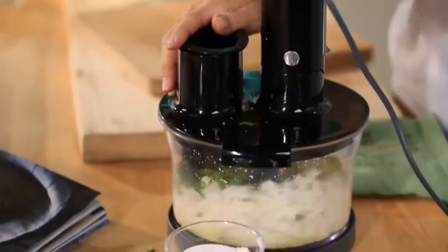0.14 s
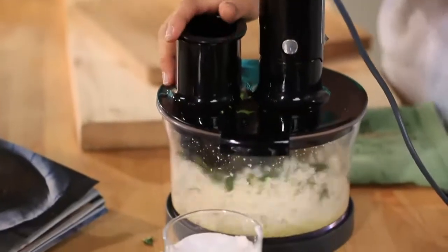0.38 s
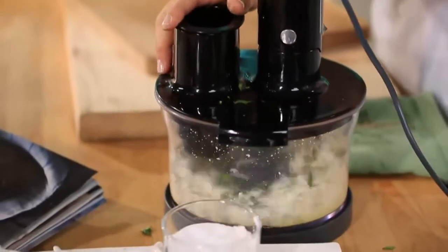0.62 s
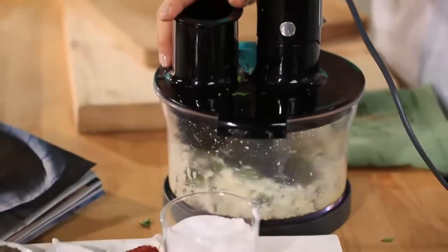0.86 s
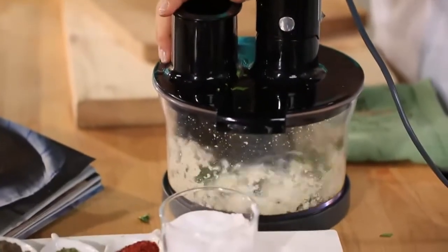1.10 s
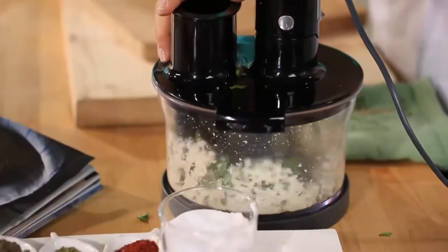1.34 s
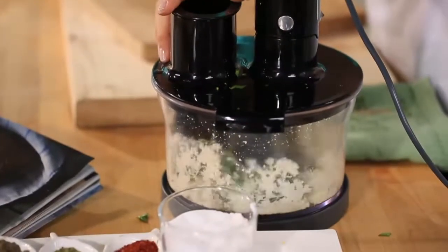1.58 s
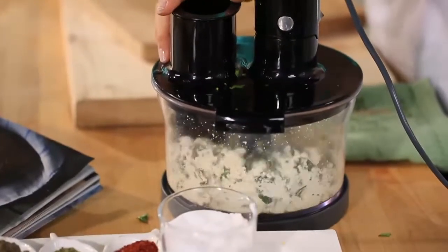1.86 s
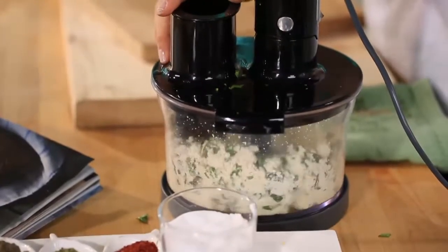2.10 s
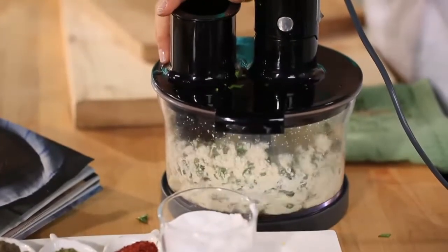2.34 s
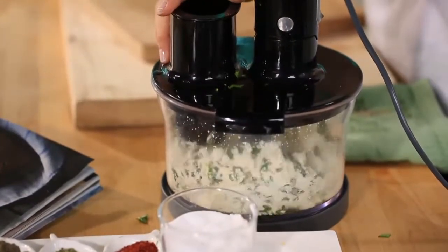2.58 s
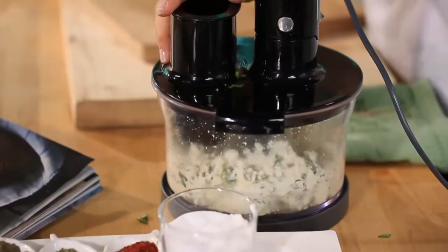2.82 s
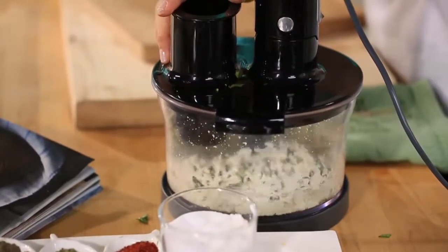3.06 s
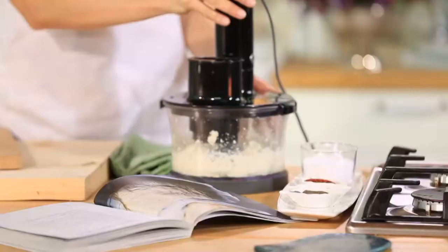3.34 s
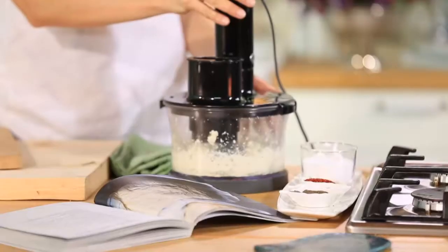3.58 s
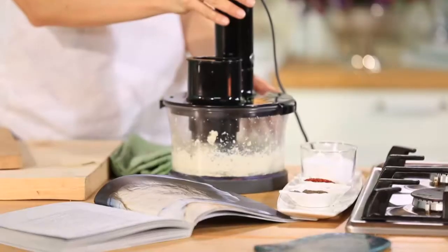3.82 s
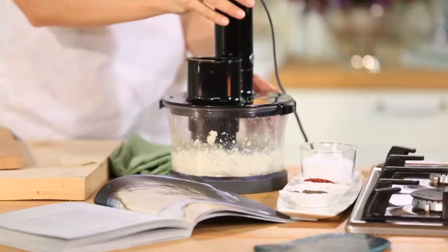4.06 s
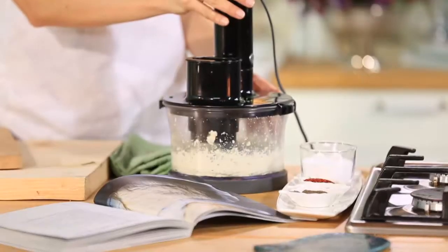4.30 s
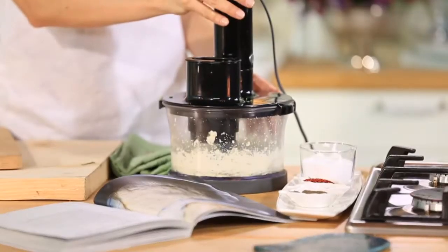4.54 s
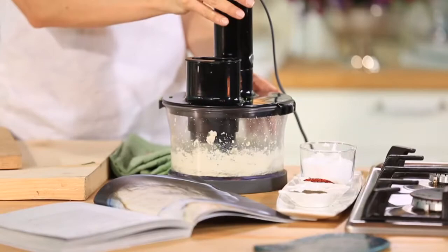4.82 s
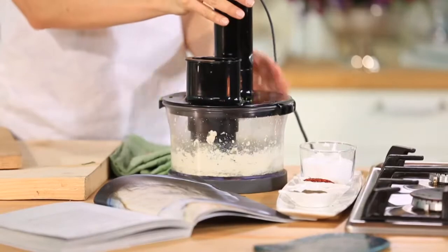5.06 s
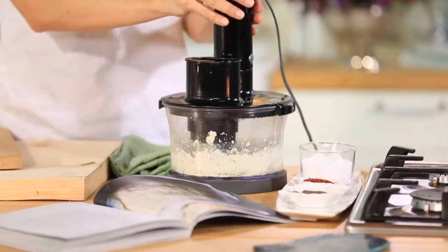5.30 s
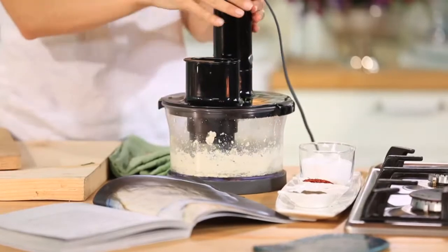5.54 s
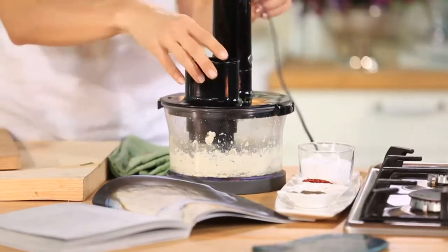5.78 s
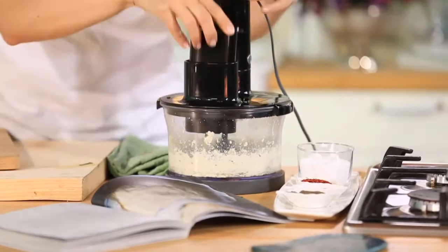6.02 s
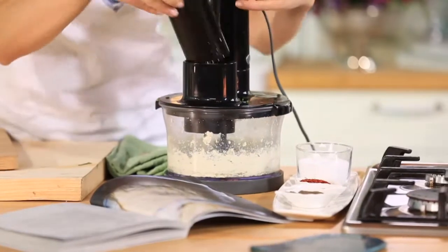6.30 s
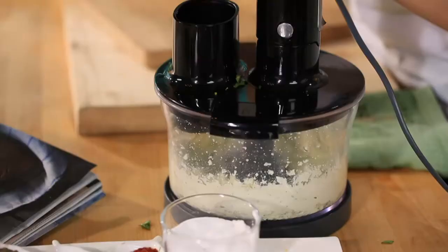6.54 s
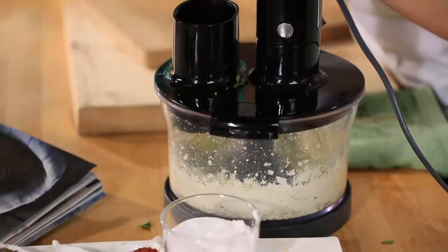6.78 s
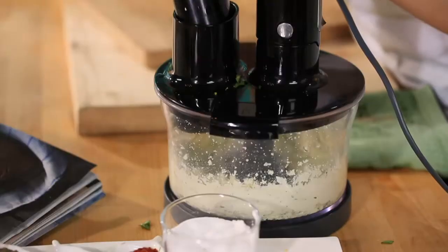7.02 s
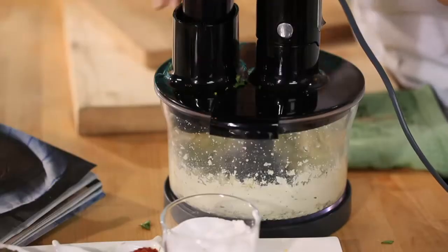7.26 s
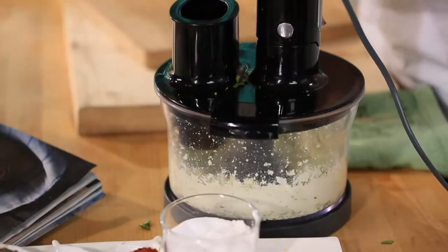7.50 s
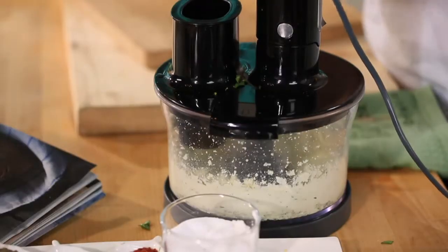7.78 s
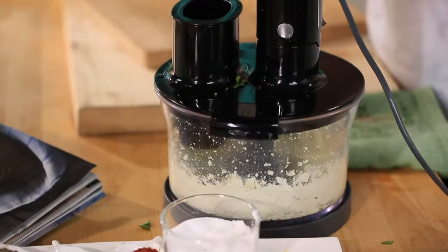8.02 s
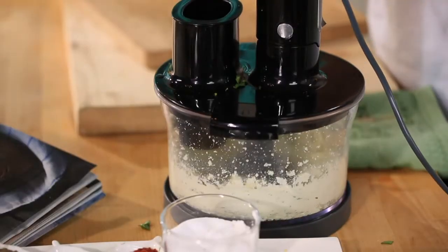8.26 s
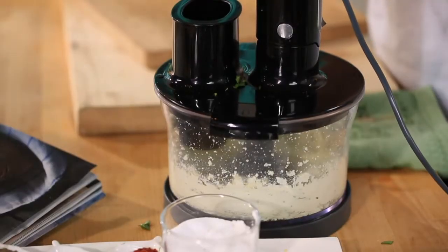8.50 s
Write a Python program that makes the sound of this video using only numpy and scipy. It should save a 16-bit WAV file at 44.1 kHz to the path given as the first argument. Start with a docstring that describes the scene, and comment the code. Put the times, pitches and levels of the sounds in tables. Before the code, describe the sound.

Electric blender whirring on a chopper bowl stops abruptly; a plastic pusher rattles and drops into its tube before the gritty whir resumes.

```python
"""Kitchen worktop: a hand blender drives a chopper bowl, stops, and later starts again.
Motor: whine and multiples, smeared gear-mesh tones, gear and brush noise through housing resonances.
While it rests, the pusher is drawn from the feed tube, rattles and drops home: knocks ring
decaying modes, sliding is gritty noise. Below: noise-like room air and a thin high steady whine."""
import sys
import numpy as np
from scipy import signal
from scipy.fft import rfft, irfft
from scipy.io import wavfile

SR = 44100
rng = np.random.default_rng(int(sys.argv[2]) if len(sys.argv) > 2 else 0)


def boost(x):
    """Linear amplitude factor 10**(x/20) for a level x in decibels (scalar or array-like)."""
    u = np.asarray(x, float) / 20
    return 10 ** u


def generate_wav(sig):
    """Save sig (samples, or channels by samples) to the path in sys.argv[1] as 16-bit PCM at SR."""
    pcm = np.round(np.clip(np.atleast_2d(sig).T, -1, 1) * 32767).astype(np.int16)
    wavfile.write(sys.argv[1], SR, pcm)


N = 380583


def rms_one(x):
    """Scale to rms 1."""
    return x / np.sqrt(np.mean(x ** 2) + 1e-20)


def in_time(rows):
    """Interpolate the columns of a timed table, sample by sample."""
    s, *columns = np.transpose(rows)
    return [np.interp(np.arange(N) / SR, s, c) for c in columns]


def butter(x, order, hz, kind="low"):
    """Butterworth filter."""
    return signal.sosfilt(signal.butter(order, hz, kind, fs=SR, output="sos"), x)


def drift(rate_hz):
    """Random wander, rms 1: white noise through two one-poles at rate_hz."""
    hop = 40   # samples per computed point
    r = np.exp(-2 * np.pi * rate_hz * hop / SR)
    white = rng.standard_normal(N // hop + 2002)
    slow = signal.lfilter([1], [1, -2 * r, r * r], white)[2000:]   # filter run-in dropped
    return np.interp(np.arange(N) / hop, np.arange(len(slow)), rms_one(slow))


def wavering_band(phase, rate_hz):
    """Narrow noise band: two quadrature carriers with independent random drift."""
    return drift(rate_hz) * np.cos(phase) + drift(rate_hz) * np.sin(phase)


def coloured(x, spectrum, peaks=()):
    """Broad spectrum times resonant peaks."""
    hz = np.fft.rfftfreq(N, 1 / SR) + 1
    points = np.array(spectrum)
    db = np.interp(np.log(hz), np.log(points[:, 0]), points[:, 1])
    for centre_hz, width_hz, peak_db in peaks:
        db = db + peak_db / (1 + (2 * (hz - centre_hz) / width_hz) ** 2)
    return irfft(rfft(x) * boost(db), N)


def ring(clicks, hz, t60_s):
    """Damped two-pole resonator: a unit click starts a sine of height 1."""
    r, w = boost(-60 / (t60_s * SR)), 2 * np.pi * hz / SR
    return signal.lfilter([0, np.sin(w)], [1, -2 * r * np.cos(w), r * r], clicks + 1e-18)


# switch presses: on t/s, off t/s, spin-up time constant/s
RUNS = [(0.093, 5.532, .062), (7.747, 9.0, .11)]
START_SHARE, COAST_S = 0.5, 0.14   # share of full speed at switch-on; run-down
ATTACK_S, FULL_S, FULL_DB, COAST_DB = 0.0023, 0.025, 13.5, 30.5   # quick rise, slower rest; run-down loss


def switch():
    """Share of full speed while spinning up, run-down seconds, level/dB (silent at rest)."""
    t = np.arange(N) / SR
    run = np.maximum(np.digitize(t, [on for on, *_ in RUNS]) - 1, 0)
    on_s, off_s, spin_s = np.transpose(RUNS)[:, run]
    since, coast_s = np.maximum(t - on_s, 1e-9), np.maximum(t - off_s, 0)
    spin = 1 - (1 - START_SHARE) * np.exp(-since / spin_s)
    attack = 1 - np.exp(-(since / ATTACK_S) ** 2)
    rise_db = 20 * np.log10(attack + 1e-9) - FULL_DB * np.exp(-since / FULL_S)
    level_db = np.where(coast_s < COAST_S, rise_db - COAST_DB * (coast_s / COAST_S) ** 2, -200)
    return spin, coast_s, level_db


# blade catches food, slows, frees itself: t/s of lowest speed, whine drop/Hz
SNAGS = [(3.44, 8.37), (3.689, 28), (4.1, 31.7), (4.39, 34), (4.7, 28), (4.96, 26.3), (5.129, 32.5),
         (5.388, 24), (8.126, 38), (8.351, 37.7), (8.509, 13.4)]
SNAG_FALL_S, SNAG_RISE_S = 0.07, 0.03
COAST_HZ_PER_S = 1600
CRUISE_HZ, SPEED_RANGE_PERCENT = 388, 16.3


def rotor(cruise_hz, spin, coast_s):
    """Whine phase (two beats a turn), speed offset/% and snag/Hz: load and snags slow the blade."""
    t = np.arange(N) / SR
    snag_hz = np.zeros(N)
    for s, drop_hz in SNAGS:
        length_s = np.where(t < s, SNAG_FALL_S, SNAG_RISE_S)
        snag_hz += drop_hz * np.exp(-((t - s) / length_s) ** 2)
    whine_hz = np.maximum((cruise_hz - snag_hz) * spin - COAST_HZ_PER_S * coast_s, 50)
    offset_percent = 100 * (whine_hz / CRUISE_HZ - 1)
    offset_percent = np.clip(offset_percent, -SPEED_RANGE_PERCENT, SPEED_RANGE_PERCENT)
    phase = 2 * np.pi * np.cumsum(whine_hz * (1 + 0.001994 * drift(18.85))) / SR
    return phase, offset_percent, snag_hz


WHINE_WAVER_DB, UNBALANCE_POWER = 2.0, 2.1


def whine(phase, whine_db, spin):
    """Rotor tone; amplitude grows with a power of speed during spin-up."""
    level = boost(whine_db + WHINE_WAVER_DB * drift(10.6)) * spin ** UNBALANCE_POWER
    return np.sqrt(2) * level * np.sin(phase)


# multiple of whine, level/dB re common strength, dB per % speed, dB per Hz snag, waver/dB
ORDER_TONES = [(2, -16, 1.4, 0, 2.5), (3, -9.5, 0.03, -.28, 1.2), (6, -14.5, 0.5, -0.14, 1.5),
               (6.5, -24, -1, 0, 3), (7, -12.5, 0, .24, 1.5), (8, -27, -.9, -.15, 2),
               (13, -28, 0, 0.0276, 2.5)]
# coupling takes up the load, 7th multiple flares: t/s, length/s, level/dB
TAKE_UPS = [(0.175, .03, 8), (7.787, .013, 13)]


def multiples(phase, multiples_db, offset_percent, snag_hz):
    """Multiples of the whine; each level follows speed and snags and wavers."""
    t = np.arange(N) / SR
    flare_db = sum(db * np.exp(-((t - s) / length_s) ** 2) for s, length_s, db in TAKE_UPS)
    out = np.zeros(N)
    for k, db, slope_db, snag_db, waver_db in ORDER_TONES:
        level_db = multiples_db + db + flare_db * (k == 7)
        level_db = level_db + slope_db * offset_percent + snag_db * snag_hz + waver_db * drift(7.5)
        out += np.sqrt(2) * boost(level_db) * np.sin(k * phase + k * k)
    return out


# multiple of whine, smear rate/Hz, level/dB re gear noise
MESH = [(10.75, 170, -17.5), (13.06, 430, -13), (20.67, 290, -17.5), (27.2, 220, -14), (34, 200, -24)]


def gear_mesh(phase, hum):
    """Uneven teeth smear each mesh tone into a band that follows the speed."""
    mesh = np.zeros(N)
    for k, smear_hz, db in MESH:
        mesh += np.sqrt(2) * boost(db + 2.0 * drift(7.3)) * drift(smear_hz) * np.sin(k * phase)
    return mesh * (1 + 0.068 * hum)


def gear_noise(phase, hum, throb=0.11):
    """White noise throbbing once and twice a turn, lightly at twice the mains."""
    throbbing = 1 + throb * (np.cos(phase / 2) + np.cos(phase)) + 0.13 * hum
    return rng.standard_normal(N) * throbbing * boost(1.07 * drift(25))


# brush hiss/dB re gear noise, one value per stage
HISS_DB = [11.5, 7, 5]
HISS_LAG_S, HISS_LAG_DB = 0.015, 9.5   # hiss comes up just after the gears


def brush_hiss(phase, hum, stage, throb=0.19):
    """White noise throbbing at twice the mains and once a turn."""
    t = np.arange(N) / SR
    hiss_db = np.array(HISS_DB)[stage]
    for on_s, *_ in RUNS:
        hiss_db = hiss_db - HISS_LAG_DB * (t < on_s + 0.1) * np.exp(-np.maximum(t - on_s, 0) / HISS_LAG_S)
    throbbing = 1 + throb * hum + 0.1 * np.cos(phase / 2)
    return boost(hiss_db) * rng.standard_normal(N) * throbbing * boost(0.28 * drift(40))


# broad motor noise colour: f/Hz, relative level/dB per Hz
MOTOR_NOISE = [(24, -48.5), (40, -32.5), (247, -7), (378, -1), (929, -9.5), (1160, -7), (2010, -11.5),
               (2590, -8.5), (3240, -15), (5070, -19.5), (6840, -22.5), (11000, -18), (15600, -29)]
# housing, bowl and tube resonances, per stage: f/Hz, width/Hz, level/dB re broad colour
FIRST_COLOUR = [(648, 56, 2), (1394, 680, 6.5), (2600, 770, 8), (4380, 430, 7), (5100, 630, 3.5),
                (6350, 230, 5.5), (7370, 130, 7.5), (8980, 400, 4.5), (9670, 160, 5), (10860, 920, 4),
                (11900, 290, -3), (13960, 500, 8.5), (15400, 190, 13.5)]
SECOND_COLOUR = [(614, 68, 0.7), (1110, 280, 4), (1700, 340, 8.8), (2550, 540, 5.2), (4200, 1600, 4.1),
                 (5080, 640, 5.2), (6230, 150, 8.4), (7250, 370, 9.1), (8300, 170, 3.7), (9350, 160, 2),
                 (10670, 2200, 11.7), (12100, 200, 1.2), (14100, 460, 2.9), (14610, 940, 12)]
RESTART_COLOUR = [(630, 49.9, 2.812), (1070, 540, 9.1), (1850, 190, 2.8), (2143, 920, 10.6),
                  (3020, 200, 7.8), (4770, 600, 8.4), (6180, 110, 1.8), (7360, 410, 8.7),
                  (10800, 2000, 6.5), (13700, 360, 4.4), (15500, 390, 8.6)]
HOUSING_SHARE = 0.42   # share of resonance dB applied to the multiples


def housing(gear, noise, tones, stage):
    """Plastic resonances colour noise and tones; the colour changes abruptly between stages."""
    out = np.zeros(N)
    for k, peaks in enumerate([FIRST_COLOUR, SECOND_COLOUR, RESTART_COLOUR]):
        # level reference: coloured gear noise within this band
        scale = np.std(butter(coloured(gear, MOTOR_NOISE, peaks), 4, [1300, 3500], "band"))
        out += coloured(noise * (stage == k), MOTOR_NOISE, peaks) / scale
        shallow = [(hz, width_hz, db * HOUSING_SHARE) for hz, width_hz, db in peaks]
        out += coloured(tones * (stage == k), [(1, 0), (SR, 0)], shallow)
    return out


# t/s, level/dB
BUZZ = [(0.19, -45), (0.45, -74), (0.8, -53), (0.9, -62), (1.06, -45), (1.27, -64), (1.43, -48.5),
        (1.9, -49), (2.27, -62), (2.55, -53.5), (3.33, -53.5), (3.42, -46.5), (5.52, -51), (7.9, -50),
        (8.25, -59), (8.63, -53)]


def winding_buzz(hum):
    """Windings hum at twice the mains, swelling and fading."""
    return np.sqrt(2) * boost(in_time(BUZZ)[0]) * hum


# per stage: f/Hz, flutter rate/Hz, level/dB, fade/dB per s
TUBE_AIR = [(595.7, 17, -23.5, 1.95), (630, 21, -35, -0.7), (618, 29, -29.5, 11)]


def tube_hum(stage):
    """Motor shakes the feed-tube air, which hums in a narrow, fluttering band."""
    out, t = np.zeros(N), np.arange(N) / SR
    for k, (hz, flutter_hz, db, fade_db) in enumerate(TUBE_AIR):
        now = stage == k
        start_s = max(t[now][0], RUNS[k // 2][0])
        out += now * boost(db - fade_db * (t - start_s)) * wavering_band(2 * np.pi * hz * t, flutter_hz)
    return out


# blade load: t/s, whine f/Hz, gear noise/dB, whine/dB, multiples/dB
DRIVE = [(0.1, 424, -22, -19, -25.5), (0.33, 426.2, -23.5, -34, -26.5), (0.55, 411.4, -24, -22, -27.5),
         (0.89, 394.6, -24, -24, -25.5), (1.0, 399.3, -25, -36, -30), (1.2, 391, -25, -33, -22.5),
         (1.55, 384.3, -25, -26, -27), (2.0, 385.5, -24.5, -25.5, -26), (2.53, 388.8, -25, -31.5, -25),
         (3.3, 388, -24.5, -27.5, -26), (3.5, 389, -26.5, -33, -26), (3.95, 379.2, -26, -30.5, -27),
         (4.3, 380.9, -26.5, -33.5, -27), (4.8, 390.8, -26, -34.5, -29.5), (5.3, 392.7, -26, -28.5, -23.5),
         (5.5, 383.6, -27, -30, -30), (7.79, 397, -25, -33, -24.5), (7.95, 398.8, -25, -31.5, -33),
         (8.2, 388, -25.5, -38.5, -29.5), (8.63, 390.2, -26.5, -32, -29)]
COLOUR_CHANGE_S, RESTART_S = 3.37, 7.0   # stage boundaries; the second lies in the pause
HUM_HZ = 100   # twice the mains


def motor():
    """Rotor tones, gear mesh, gear and brush noise, buzz and tube hum under one switch."""
    t = np.arange(N) / SR
    cruise_hz, noise_db, whine_db, multiples_db = in_time(DRIVE)
    spin, coast_s, switch_db = switch()
    phase, offset_percent, snag_hz = rotor(cruise_hz, spin, coast_s)
    stage = np.digitize(t, [COLOUR_CHANGE_S, RESTART_S])
    hum = np.cos(2 * np.pi * HUM_HZ * t)
    tones = multiples(phase, multiples_db, offset_percent, snag_hz)
    gear, brush = gear_noise(phase, hum), brush_hiss(phase, hum, stage)
    noise = boost(noise_db) * (butter(gear, 4, 5600) + butter(brush, 4, 5600, "high"))
    body = housing(gear, noise, tones, stage)
    mesh = boost(noise_db) * gear_mesh(phase, hum)
    running = body + whine(phase, whine_db, spin) + mesh + winding_buzz(hum) + tube_hum(stage)
    return boost(switch_db) * running


# pusher on tube and lid: t/s, air column level/dB, thump level/dB, wall level/dB, crack level/dB
KNOCKS = [(0.041, -58, -53, -61, -41), (5.882, -28, -35, -47, -39), (6.014, -36, -48, -36, -30.5),
          (6.046, -53, -47, -57, -39), (6.14, -51, -58, -42.5, -38.5), (6.157, -58, -48, -44, -44),
          (6.177, -38, -56, -36.5, -42), (6.309, -51, -37, -37, -41), (6.945, -24.5, -31, -31, -32),
          (7.01, -35, -27, -30, -23.5), (7.024, -31.5, -35, -26, -18), (7.036, -46, -29, -34, -34),
          (7.276, -44, -51, -52, -43), (7.33, -48, -48, -49, -59), (7.356, -46, -35, -32, -27),
          (7.365, -3.5, -32, -13, -10), (7.372, -45, -20, -27, -20), (7.392, -40, -41, -26, -24),
          (7.407, -18.5, -27, -29, -41), (7.416, -42, -31, -39, -32), (7.594, -63, -56, -54, -53),
          (7.649, -57, -53, -56, -45), (7.694, -54, -62, -55, -43)]
# modes rung by each knock: f/Hz, level/dB re knock, t60/s
AIR_COLUMN = [(634, 3.5, 0.11), (635, -32.5, 1.1)]
THUMP = [(145, -7, .09), (233, 0.5, 0.041), (423, 3, 0.02)]
WALL = [(775, 2, 0.017), (886, 4.5, 0.022), (1033, -10, 0.08), (1230, -9.5, 0.018), (1600, -22.5, 0.0071),
        (1494, 2.5, 0.022), (1810, -4.5, 0.021), (2220, -13, 0.013)]
CRACK = [(3520, -9, 0.006), (4600, -1, 0.0026), (6650, -24, 0.0037), (7940, -12, .004)]
SNAP_DB, SNAP_T60_S = -4.5, 0.019   # level re crack column
CONTACT_SPREAD_S = 0.0028   # longest delay within one contact


def knocks(rows):
    """Each contact rings every mode with its own random strength, plus a broad noise snap."""
    out = np.zeros(N)
    at = np.round(rows[:, 0] * SR).astype(int)
    # modes, contact low-pass/Hz, strength spread/dB
    parts = [(AIR_COLUMN, 900, 0.5), (THUMP, 600, 3), (WALL, 2500, 3), (CRACK, 12000, 2.5)]
    for column, (modes, contact_hz, spread_db) in enumerate(parts):
        solid = min(column, 1)   # air column: no delay, no alternating sign
        chance = rng.standard_normal((len(at), len(modes)))
        # the contact spreads over the rim
        late = (rng.random(chance.shape) * CONTACT_SPREAD_S * SR * solid).astype(int)
        part = np.zeros(N)
        for k, (hz, db, t60_s) in enumerate(modes):
            clicks = np.zeros(N)
            strength_db = rows[:, column + 1] + db + spread_db * chance[:, k]
            clicks[at + late[:, k]] = (-1) ** (k * solid) * boost(strength_db)
            part += ring(clicks, hz, t60_s)
        out += butter(part, 2, contact_hz)   # longer contact rounds the low modes' attack
    clicks = np.zeros(N)
    clicks[at] = boost(rows[:, 4] + SNAP_DB)
    decay = signal.lfilter([1], [1, -boost(-60 / (SNAP_T60_S * SR))], clicks + 1e-18)
    return out + butter(rng.standard_normal(N) * decay, 2, [2200, 11000], "band")


# f/Hz, width/Hz, level/dB
SLIDE_COLOUR = [(998, 670, -8), (1600, 500, 3), (4840, 500, 0), (7000, 5000, 4)]


def sliding_grit():
    """Dense fine grit: wavering noise through resonances, rms 1."""
    grit = rng.standard_normal(N) * boost(4.0 * drift(60))
    bands = [boost(db) * rms_one(ring(grit, hz, 1.6 / width_hz)) for hz, width_hz, db in SLIDE_COLOUR]
    return rms_one(sum(bands))


# pusher in tube: start t/s, end t/s, peak level/dB, peak light rattles per s
SLIDING = [(5.93, 6.083, -56, 40), (6.12, 6.268, -60, 15), (6.29, 6.42, -66, 20), (7.15, 7.303, -61, 1),
           (7.325, 7.38, -48, 1)]
# light rattle: air column/dB, thump/dB, wall/dB, crack/dB
RATTLE_DB = (-63, -39.5, -52, -58)


def pusher():
    """Knocks, and half-sine strokes of sliding grit with light random rattles."""
    t = np.arange(N) / SR
    strokes = [np.sin(np.pi * np.clip((t - a) / (b - a), 0, 1)) for a, b, *_ in SLIDING]
    rattles_per_s = sum(shape * row[3] for shape, row in zip(strokes, SLIDING))
    loose = t[rng.random(N) < rattles_per_s / SR]
    rattles = [(s, *(np.array(RATTLE_DB) + 3.3 * rng.standard_normal(4))) for s in loose]
    contacts = knocks(np.array(KNOCKS + rattles))
    rub = sliding_grit() * sum(shape * boost(row[2]) for shape, row in zip(strokes, SLIDING))
    return butter(contacts + rub, 4, 120, "high")   # removes the resonators' DC and rumble below 120 Hz


# t/s, f/Hz, level/dB
SQUEAK = [(7.15, 5100, -88), (7.2, 4850, -69), (7.26, 4500, -64), (7.3, 4300, -83)]
SQUEAK_RATE_HZ = 150   # roughness


def squeak():
    """The rubbing pusher whistles: a rough, falling narrow band."""
    hz, db = in_time(SQUEAK)
    phase = 2 * np.pi * np.cumsum(hz) / SR
    return boost(db) * (db > -84) * wavering_band(phase, SQUEAK_RATE_HZ)


# t/s, level/dB
PINGS = [(0.041, -60), (7.026, -40)]
PING_HZ, PING_T60_S = 3290, 0.092


def pings():
    """A small hard part rings thinly: one damped mode."""
    clicks = np.zeros(N)
    for s, db in PINGS:
        clicks[int(s * SR)] = boost(db)
    return ring(clicks, PING_HZ, PING_T60_S)


LOW_T60_S, TREBLE_T60_S = 0.79, 0.35


def kitchen(x):
    """Dense reflections after a 6 ms gap; treble dies sooner."""
    t = np.arange(SR // 2) / SR
    low = butter(rng.standard_normal(len(t)), 1, 2500)
    high = butter(rng.standard_normal(len(t)), 1, 2500, "high")
    echoes = low * boost(-60 * t / LOW_T60_S) + 1.77 * high * boost(-60 * t / TREBLE_T60_S)
    echoes = echoes * (t > 0.006)
    return signal.fftconvolve(x, echoes / np.sqrt(np.sum(echoes ** 2)))[:N]


# air colour: f/Hz, relative level/dB per Hz
ROOM = [(15, -57.5), (25, -33), (94, -5.5), (194, -17), (260, -4), (290, -10), (898, -23.5), (1620, -27),
        (4060, -39), (8860, -44), (9610, -39.5), (10400, -41), (15600, -63.5)]
ROOM_DB = -56   # rms
# thin high whine: f/Hz, level/dB
STEADY_TONES = [(9448, -75), (9598, -82.5), (9749, -87.5)]


def room_floor():
    """Coloured air noise and a cluster of fixed-pitch, slightly wavering tones."""
    t = np.arange(N) / SR
    out = boost(ROOM_DB + 1.0 * drift(4)) * rms_one(coloured(rng.standard_normal(N), ROOM))
    for hz, db in STEADY_TONES:
        out += np.sqrt(2) * boost(db + 2.5 * drift(3)) * np.sin(2 * np.pi * hz * t)
    return out


MOTOR_ECHO_DB, KNOCK_ECHO_DB = -12.5, -16


def scene():
    """Motor and pusher on the worktop, their reflections, the room floor."""
    running, handling = motor(), pusher() + squeak() + pings()
    echoes = kitchen(boost(MOTOR_ECHO_DB) * running + boost(KNOCK_ECHO_DB) * handling)
    return (running + handling + echoes + room_floor())[None]


def top_cut(x):
    """Nothing passes above the cut-off."""
    return signal.sosfilt(signal.butter(12, 16630, fs=SR, output="sos"), x)


CUTOFF_HZ = 15720


def record(dry):
    """Limits peaks to full scale, then cuts the top with a steep elliptic low-pass."""
    low_pass = signal.ellip(14, 0.5, 75, CUTOFF_HZ, fs=SR, output="sos")
    mix = signal.sosfilt(low_pass, np.clip(dry, -1, 1))
    return top_cut(mix)


dry = scene()
out = record(dry)
generate_wav(out)
```